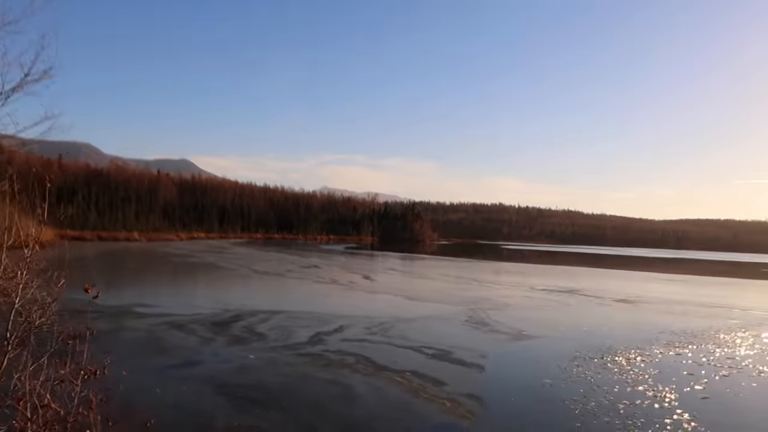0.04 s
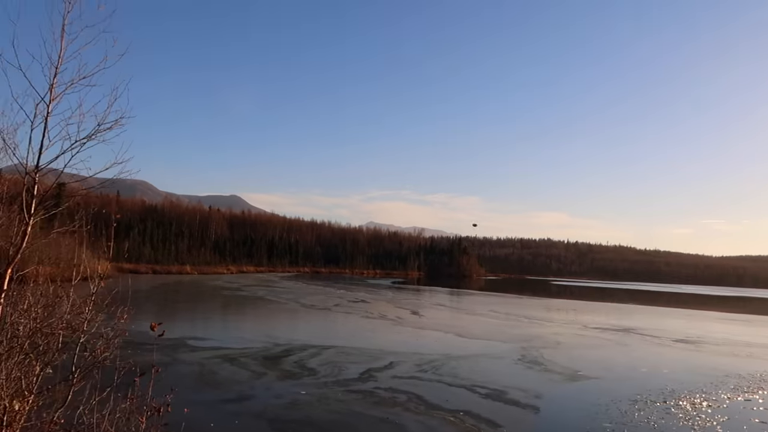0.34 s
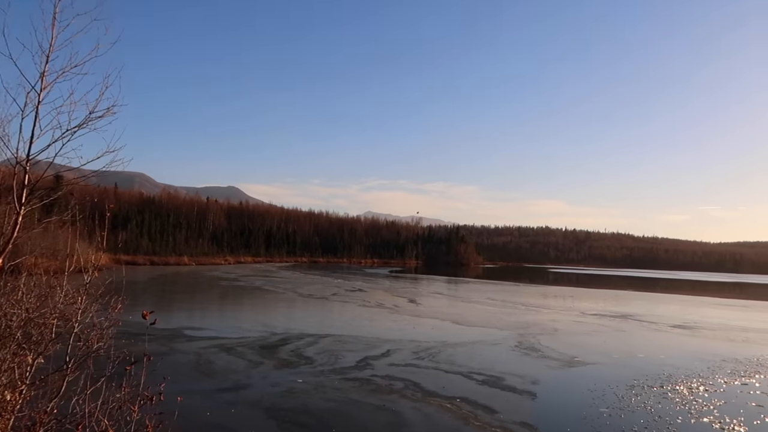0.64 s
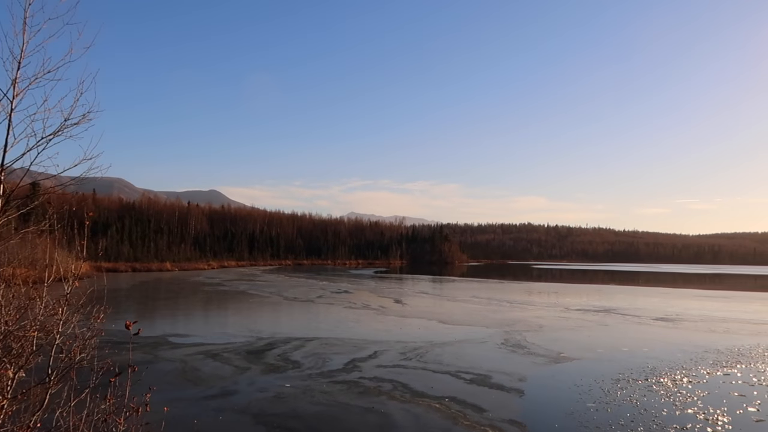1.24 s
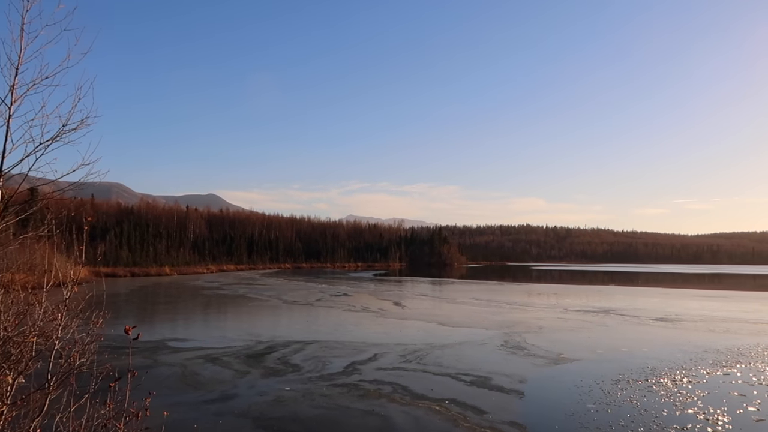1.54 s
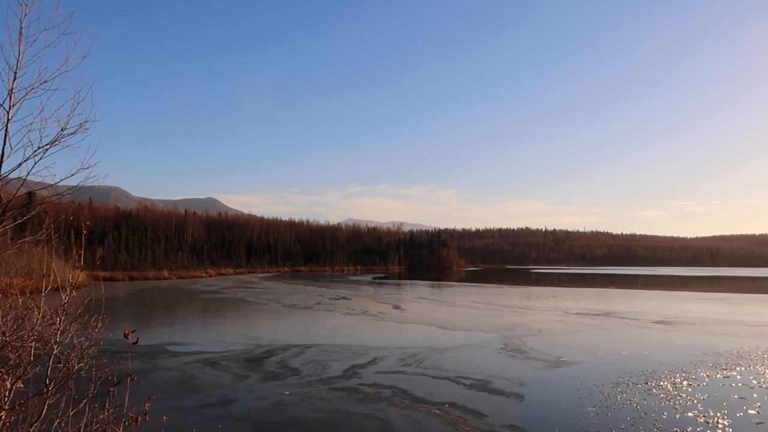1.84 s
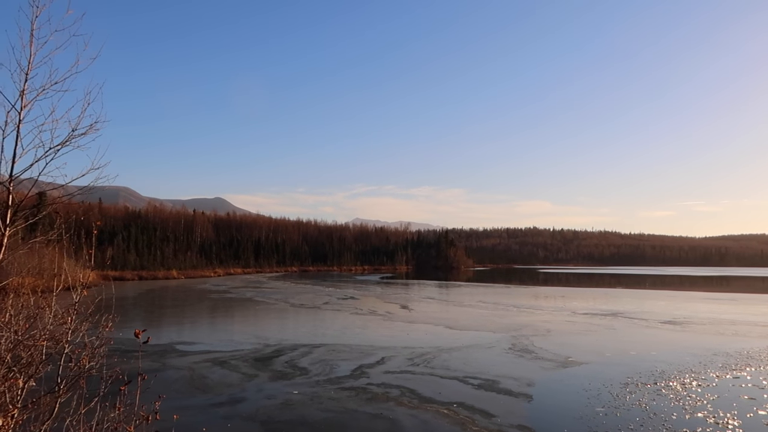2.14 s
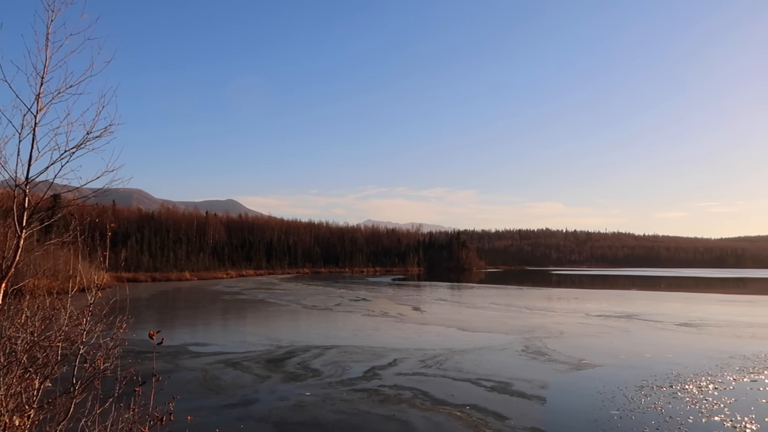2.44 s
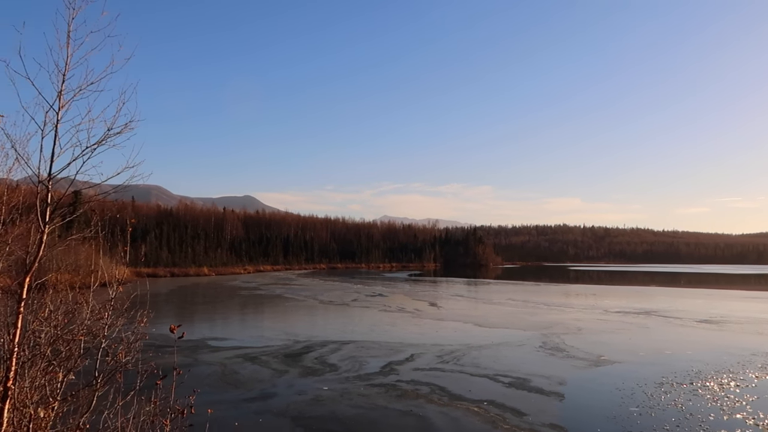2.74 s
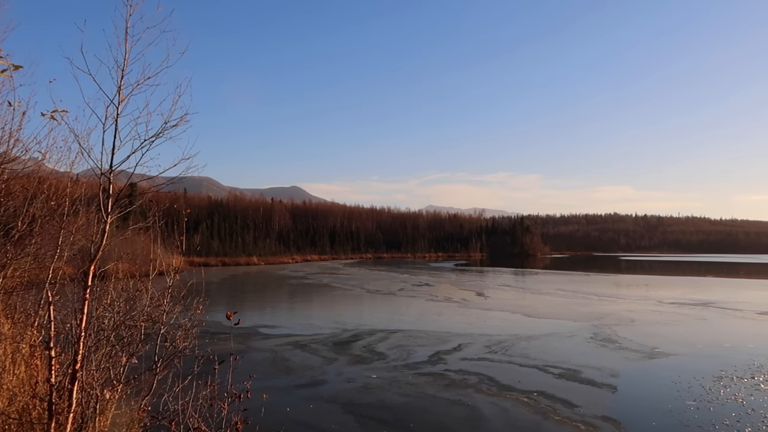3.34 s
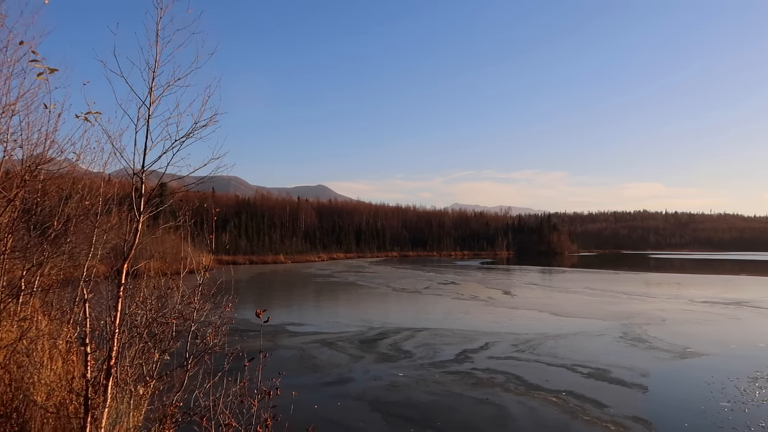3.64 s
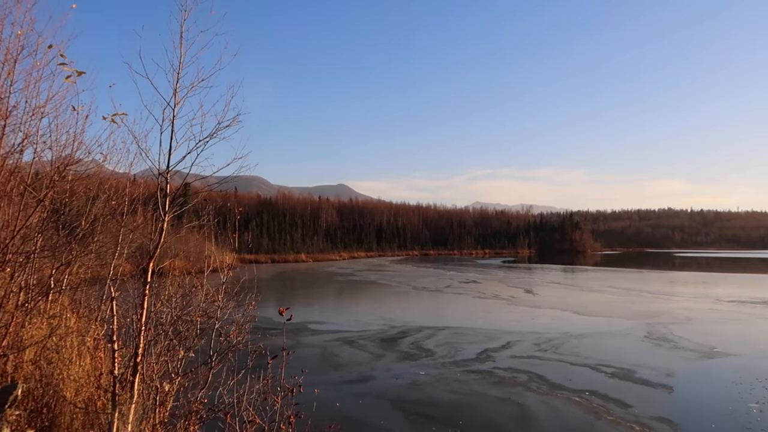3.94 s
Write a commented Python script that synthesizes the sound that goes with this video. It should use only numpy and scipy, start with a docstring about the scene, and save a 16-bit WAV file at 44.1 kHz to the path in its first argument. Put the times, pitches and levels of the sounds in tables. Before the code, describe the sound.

A stone skips across thin lake ice with short falling chirps, over light wind.

```python
"""A sleeve flaps and something clacks as a stone is thrown out over a thinly frozen lake.
After its flight the stone skips away. Bending waves in the ice outrun each other, treble first, so each
touch is a falling chirp that ends in a faint knock; the last touches blur into a broken ring.
Small ticks and crackle, as of grit, dot the skips. Light wind and a far low drone lie under it."""
import sys
import numpy as np
from scipy import signal
from scipy.fft import rfft, irfft
from scipy.io import wavfile
from scipy.ndimage import uniform_filter1d

SR = 44100
rng = np.random.default_rng(int(sys.argv[2]) if len(sys.argv) > 2 else 0)


def output_pcm(signal):
    """Save a mono or channel-first signal as 16-bit PCM at the path in sys.argv[1].

    Samples are clipped to [-1, 1] before scaling.
    """
    pcm = np.clip(np.atleast_2d(signal).T, -1, 1) * 32767
    wavfile.write(sys.argv[1], SR, np.round(pcm).astype(np.int16))


N = 176400

# Paths through the ice (direct, scattered, splintered treble echo): freq_hz, gain_db
DIRECT_EQ = [(200, -18), (700, -3), (1400, 2), (1750, -5), (2060, -1), (2230, -37), (2500, -21),
             (2900, -61), (4000, -37), (6000, -76), (12000, -70)]
SCATTER_EQ = [(200, -22), (700, 13.5), (1500, 2.5), (2050, -2), (2300, -7), (3100, -15), (4200, -27.5),
              (6000, -37), (12000, -56)]
SPLINTER_EQ = [(1000, -45), (2000, -36), (2500, -17.5), (3100, -31.5), (3600, -28), (4500, -59),
               (9000, -70)]
def ice_paths(hz, low_hz, scatter_db, size):
    """Stereo response of the sheet: flaws scatter the wave, and the ice rings on near its lowest pitch."""
    scattered = amp(scatter_db + spectrum_at(SCATTER_EQ, hz)) * rfft(echoes(size, t60_s=0.12))
    splintered = amp(spectrum_at(SPLINTER_EQ, hz)) * lag(hz, 0.016) * rfft(echoes(size, t60_s=0.0069))
    paths = amp(spectrum_at(DIRECT_EQ, hz)) + scattered + splintered
    flaw = amp(-12) * lag(hz, 0.006 * rng.uniform(0.527, 1))  # close copy: the chirp flutters
    near_bank = amp(-22.5) * lag(hz, 0.02)
    ring = amp(-5.5) * band(hz, 0.9 * low_hz, width_oct=0.21) * rfft(echoes(size, t60_s=1.34))
    return paths * (1 + flaw + near_bank) + ring


# Touches: time_s (chirp passes 2 kHz), level_db, sweep_s, low_hz, tilt_db_per_oct, scatter_db, knock_db
TOUCHES = [(1.7363, -9, 0.042, 1541, -13, 1, -11), (1.7456, -1, 0.054, 1541, -25, -15, -14),
           (1.7727, -18.5, .05, 1477, -1, -21, 3.5), (2.002, 2, 0.058, 1472, 1, -9.5, -17.5),
           (2.2353, -2, .06, 1461, -3, -6.5, -15.5), (2.3857, -15.5, 0.06, 1493, 6, -17, -9.5),
           (2.5976, -5.5, 0.061, 1439, 4, -7.5, -33), (2.7027, -7.5, 0.067, 1423, -2, -17, -15),
           (2.8135, -24.5, 0.062, 1451, 22, -4, -13), (2.8701, -21.5, 0.081, 1400, -6, -6, -31),
           (2.946, -3.5, 0.062, 1404, 5, -14, -17), (3.1696, -4.5, 0.067, 1368, 8, -7.5, -17),
           (3.3359, -11, 0.076, 1354, -2.5, -2, -18), (3.374, -21, 0.077, 1360, 2, -2, -33),
           (3.4135, -17.5, 0.07, 1353, -2, 0.5, -21), (3.457, -19, 0.07, 1348, -3, -1, -11),
           (3.474, -21.5, 0.081, 1341, -12, -2.5, -28), (3.567, -18, 0.068, 1341, 1, -2, -12),
           (3.584, -23.5, 0.08, 1339, -26, -7, -21), (3.616, -29, .08, 1367, -12, 1, -25),
           (3.686, -20, 0.072, 1348, -7, -3.5, -6), (3.712, -30.5, .08, 1360, -12, 0, -27),
           (3.809, -18.5, 0.074, 1354, -3, -4.5, -28), (3.847, -26, 0.078, 1363, 2, 0, -27),
           (3.917, -27, 0.072, 1350, -1, 1, -25), (3.937, -29, .078, 1366, -12, -6, -25)]
# Closing knock and echo from the banks: freq_hz, gain_db
KNOCK_EQ = [(80, 0.5), (300, -3), (600, 1), (900, -10), (1400, -4), (3000, -22), (6000, -28), (12000, -32)]
SHORE_EQ = [(200, 2), (550, 0), (1000, 2), (1450, -7), (2000, 7), (3000, 13), (8000, -8)]
def skips(gain_db=21, sweep_mid_hz=1682.4, right_lag_s=42e-6, size=32768, preroll=512):
    """Each touch sends a bending wave: treble arrives first, a knock last, and the banks echo both."""
    out = np.zeros((2, N))
    hz = np.fft.rfftfreq(size, 1 / SR) + 1e-3
    lateness = 1 / (1 + (hz / sweep_mid_hz) ** 5)
    for time_s, level_db, sweep_s, low_hz, tilt_db_per_oct, scatter_db, knock_db in TOUCHES:
        delay_s = sweep_s * np.minimum(lateness, np.interp(low_hz, hz, lateness))
        start_s = time_s - np.interp(2000, hz, delay_s)
        dispersion = np.exp(-2j * np.pi * np.cumsum(delay_s) * SR / size)
        # The ice hardly radiates below low_hz.
        highpass = 1 / (1 + (low_hz / np.maximum(hz, 100)) ** 45)
        leak = amp(-18.5) * np.minimum(hz / low_hz, 1) ** 2
        tilt = amp(tilt_db_per_oct * np.log2(np.clip(hz, 1300, 2200) / 1750))
        chirp = irfft(dispersion * (highpass + leak) * tilt * ice_paths(hz, low_hz, scatter_db, size))
        add(out, start_s - preroll / SR, amp(gain_db + level_db) * np.roll(chirp, preroll, axis=1))
        knock = colour(echoes(size, t60_s=0.12), KNOCK_EQ)[:, :size // 2]
        add(out, start_s + delay_s[0], amp(gain_db + level_db + knock_db) * knock)
    shore = signal.fftconvolve(out, echoes(SR, t60_s=1, spread=0.19), axes=1)
    out += amp(-25) * colour(shore, SHORE_EQ)[:, :N]
    out[1] = np.interp(np.arange(N) - right_lag_s * SR, np.arange(N), out[1])
    return out


# Last skitter: time_s, level_db
SKITTER_LEVEL = [(3.2, -100), (3.38, -54), (3.5, -50), (3.55, -58), (3.63, -50), (3.68, -56), (3.74, -52),
                 (3.79, -55), (3.9, -51), (4, -51)]
# Singing sheet: freq_hz, gain_db
SKITTER_EQ = [(600, -55), (1290, -48), (1375, 11.5), (1450, -1), (1560, -8), (2000, -8), (3000, -21),
              (6000, -60)]
def skitter(uneven_db=4):
    """Countless tiny, uneven touches blur into a broken ring at the lowest pitch of the ice."""
    bumps = unit_rms(uniform_filter1d(rng.standard_normal(N), size=1200))
    contact = rng.standard_normal(N) * amp(uneven_db * bumps)
    return envelope(SKITTER_LEVEL) * unit_rms(colour(contact, SKITTER_EQ))


# Brush, hit, rebound: start_s, level_db
CLACK_HITS = [(.2403, -21), (.2456, 0), (.2477, -10)]
# Click of each hit: freq_hz, gain_db
CLACK_EQ = [(200, -12), (700, -12), (1200, 2), (1800, 5.5), (2800, 1.5), (3200, 1), (3700, -23),
            (4400, -16), (5000, -42), (7500, -37), (12000, -48)]
def clack(ring_hz=845, t60_s=0.034, size=2048):
    """A hard, dead clack at the release: three quick clicks, each with a faint ring."""
    out = np.zeros((2, N))
    t = np.arange(size) / SR
    ring = amp(-23.5 - 60 * t / t60_s) * np.sin(2 * np.pi * ring_hz * t)
    log_gain = np.log(amp(spectrum_at(CLACK_EQ, abs(np.fft.fftfreq(size, 1 / SR)))))
    click = np.fft.ifft(np.exp(np.conj(signal.hilbert(log_gain)))).real  # minimum phase: sharp front
    for start_s, level_db in CLACK_HITS:
        add(out, start_s, amp(level_db) * (amp(7.5) * click + ring))
    return out


# Arm swings: peak_s, level_db, rise_s, fall_s
ARM_SWINGS = [(0.177, -29.5, 0.016, 0.02), (0.218, -38.5, 0.0026, 0.021), (0.364, -39.5, 0.047, 0.12)]
# Cloth noise: freq_hz, gain_db
CLOTH_EQ = [(25, 6.5), (60, 0), (170, 2), (400, -4), (700, -13), (1500, -25), (3000, -30), (6000, -61),
            (12000, -73)]
def sleeve(spread=0.056):
    """Cloth swishes with the swing of the throwing arm."""
    t = np.arange(N) / SR
    swing = sum(amp(level_db) * np.exp(-np.maximum((peak_s - t) / rise_s, (t - peak_s) / fall_s) ** 2)
                for peak_s, level_db, rise_s, fall_s in ARM_SWINGS)
    noise = rng.standard_normal((3, N))
    return swing * unit_rms(colour(noise[0] + spread * noise[1:], CLOTH_EQ))


# Ticks and taps: start_s, level_db, pitch_hz, width_oct, decay_s
SNAPS = [(1.095, 8, 843, 0.12, 0.0046), (1.407, -20, 4200, .4, .002), (1.4145, -20.5, 5630, 0.45, 0.0021),
         (1.4688, -13, 4270, 0.22, 0.0038), (1.469, -10, 2000, .35, 0.0036),
         (1.523, -25, 5000, 0.76, 0.0067), (1.689, -8.5, 3700, 0.093, 0.0025),
         (1.736, -5.5, 3740, 0.16, 0.006), (1.744, 4, 2620, 0.089, .004), (1.76, -18, 8200, 0.6, 0.0011),
         (1.805, -11, 3550, 0.14, 0.0034), (1.857, -17, 3650, 0.16, .005), (1.935, -6, 1900, 0.38, 0.0055),
         (1.936, -21, 5300, 0.46, 0.005), (2.171, -13, 3730, 0.18, 0.006),
         (2.439, -12.5, 3700, 0.17, 0.0045), (2.491, -16, 3900, 0.25, .005), (2.505, -13, 3700, .2, 0.0037),
         (2.623, -11, 3450, 0.55, 0.0087), (2.692, -8, 3790, 0.19, 0.014), (3.443, -6.5, 2580, .2, .012)]
def ticks(gain_db=2, size=4096):
    """Tiny snaps, as of grit and twigs, each a short noise burst in one band."""
    out = np.zeros((2, N))
    hz, t = np.fft.rfftfreq(size, 1 / SR) + 1, np.arange(size) / SR
    for start_s, level_db, pitch_hz, width_oct, decay_s in SNAPS:
        noise = rng.standard_normal((3, size)) * np.exp(-t / decay_s)
        burst = unit_rms(noise[0] + 0.5 * noise[1:]) / np.sqrt(size)
        centred = np.roll(burst, size // 2, axis=1)
        tick = irfft(rfft(centred) * band(hz, pitch_hz, width_oct))
        add(out, start_s - size / 2 / SR, amp(gain_db + level_db) * tick)
    return out


# Grit under the first skips: time_s, level_db
GRIT_LEVEL = [(1.6, -83), (1.74, -59), (2.1, -66), (2.3, -68), (2.5, -60.5), (2.85, -69), (3.1, -70)]
def crackle(rate_per_s=110, pitch_hz=3670, width_oct=0.16, uneven_db=4):
    """Grit snaps at random moments and in uneven sizes."""
    hz = np.fft.rfftfreq(N, 1 / SR) + 1
    onsets = rng.random((3, N)) < rate_per_s / SR / 3  # centre, left, right
    snaps = onsets * amp(uneven_db * np.clip(rng.standard_normal((3, N)), -2, 2))
    grit = irfft(rfft(snaps[0] + snaps[1:]) * band(hz, pitch_hz, width_oct), N)
    return envelope(GRIT_LEVEL) * unit_rms(grit)


# Air and rumble noise: freq_hz, gain_db
AIR_EQ = [(59, -47), (100, 1), (192, -4.5), (226, -0.5), (462, -3.5), (567, -6), (836, -9), (1070, -10),
          (1160, -11.5), (1310, -11.5), (4460, -21), (13200, -33.5)]
RUMBLE_EQ = [(10, -16), (30, -2), (45, 0.5), (70, 5), (110, -1), (170, -26), (400, -58)]
# Left-right likeness of the air: freq_hz, correlation
AIR_CORRELATION = [(30, .99), (90, 0.72), (160, 0.92), (300, 0.36), (700, 0.37), (1500, -0.22),
                   (3000, -0.17), (6000, -0.17), (10000, -0.26), (13000, -0.79)]
# Background hiss and rumble level, low at first, then steady: time_s, gain_db
BACKGROUND_GAIN = [(0, -3.5), (.1, -8), (.2, 1), (.33, -1.5), (.5, 1), (1.0, 0.5), (1.6, 0.5), (2.5, 1),
                   (3.2, 1), (4, 0)]
def wind(patch_db=1, swell_db=0.4):
    """Soft wide wash of air in far trees, with drifting patches, over a low rumble."""
    frames, hz = N // 256 + 5, np.fft.rfftfreq(1024, 1 / SR)
    left_re, left_im, other_re, other_im, patches = rng.standard_normal((5, frames, len(hz)))
    patches = uniform_filter1d(patches, size=12, axis=0)
    patches = unit_rms(uniform_filter1d(patches, size=10, axis=1))
    swell = unit_rms(uniform_filter1d(rng.standard_normal(frames), size=40))[:, None]
    correlation = spectrum_at(AIR_CORRELATION, hz)
    left = left_re + 1j * left_im
    right = correlation * left + np.sqrt(1 - correlation ** 2) * (other_re + 1j * other_im)
    spectra = np.array([left, right]) * amp(spectrum_at(AIR_EQ, hz) + patch_db * patches + swell_db * swell)
    _, air = signal.istft(spectra.swapaxes(1, 2), nperseg=1024, noverlap=768)
    rumble = colour(rng.standard_normal(N), RUMBLE_EQ)
    return envelope(BACKGROUND_GAIN) * (amp(-44) * unit_rms(air[:, :N]) + amp(-53.5) * unit_rms(rumble))


# Main tone: time_s, level_db
DRONE_LEVEL = [(0.45, -43.5), (1.39, -41), (1.76, -45.5), (3.16, -47.5), (3.26, -57), (3.32, -49.5),
               (3.9, -57)]
# Hums: pitch_hz, level_db
HUM_TONES = [(60, -54), (89.5, -51.5)]
# Swell of both hums: time_s, gain_db
HUM_GAIN = [(0, 5), (1.2, -4), (1.7, -10), (2.6, 2), (3.3, -7), (4, -2.5)]
def drone(pitch_hz=72.3, waver_hz=0.21, fade_in_s=0.31):
    """A low tone and two hums, as of far machinery, beat against each other."""
    t = np.arange(N) / SR
    drift = unit_rms(colour(rng.standard_normal(N), [(0, 0), (4, 0), (30, -60), (100, -140)]))
    phase = 2 * np.pi * np.cumsum(pitch_hz + waver_hz * drift) / SR
    tone = np.sin(phase) + amp(-19) * np.sin(2 * phase)
    hums = sum(amp(db) * np.sin(2 * np.pi * (hz * t + rng.random())) for hz, db in HUM_TONES)
    fade_in = np.minimum(t / fade_in_s, 1) ** 2
    return np.sqrt(2) * fade_in * (envelope(DRONE_LEVEL) * tone + envelope(HUM_GAIN) * hums)


def amp(db):
    """Decibels to gain."""
    return 10 ** (np.asarray(db) / 20)


def unit_rms(x):
    """Scales to rms 1."""
    return x / np.sqrt(np.mean(x ** 2) + 1e-20)


def spectrum_at(points, hz):
    """Interpolates on a log-frequency axis."""
    freq_hz, value = np.transpose(points)
    return np.interp(np.log(hz + 1), np.log(freq_hz + 1), value)


def envelope(points):
    """Gain per sample from time_s, level_db points."""
    time_s, level_db = np.transpose(points)
    return amp(np.interp(np.arange(N) / SR, time_s, level_db))


def band(hz, centre_hz, width_oct):
    """Gaussian band on an octave axis."""
    return np.exp(-0.5 * (np.log2(hz / centre_hz) / width_oct) ** 2)


def lag(hz, delay_s):
    """Frequency response of a delay."""
    return np.exp(-2j * np.pi * hz * delay_s)


def colour(x, points):
    """Filters by freq_hz, gain_db points."""
    size = x.shape[-1]
    return irfft(rfft(x) * amp(spectrum_at(points, np.fft.rfftfreq(size, 1 / SR))), size)


def echoes(size, t60_s, spread=0.018):
    """Dying stereo cloud of reflections, energy 1; spread is the side-to-mid ratio."""
    mid, side = rng.standard_normal((2, size)) * amp(-60 * np.arange(size) / SR / t60_s)
    return unit_rms(np.array([mid + spread * side, mid - spread * side])) / np.sqrt(size)


def add(mix, start_s, sound):
    """Mixes a sound in at start_s."""
    part = mix[:, max(round(start_s * SR), 0):][:, :sound.shape[-1]]
    part += sound[..., :part.shape[1]]


def scene():
    """The throw, the skips and the quiet lakeside."""
    return sleeve() + clack() + skips() + skitter() + ticks() + crackle() + wind() + drone()


def record(dry):
    """Steep low-pass at 13.3 kHz."""
    lowpass = signal.firwin(255, 13300, window=("kaiser", 8), fs=SR)
    return signal.oaconvolve(dry, lowpass[None], "same")


dry = scene()
out = record(dry)
output_pcm(out)
```